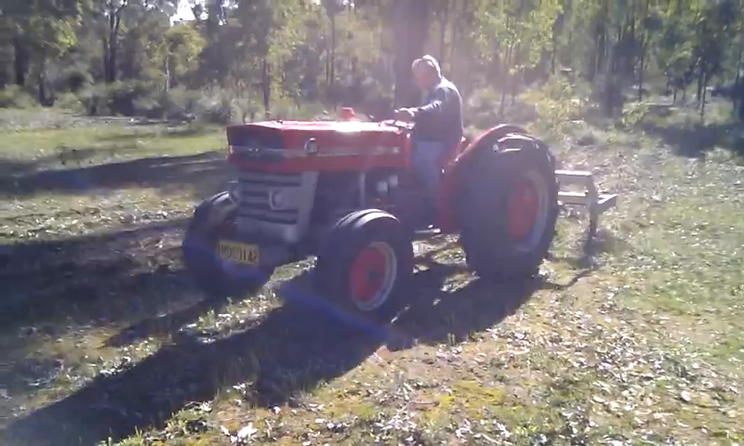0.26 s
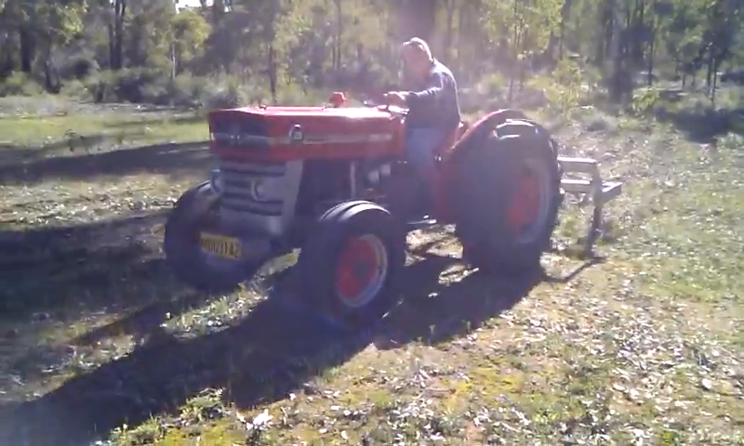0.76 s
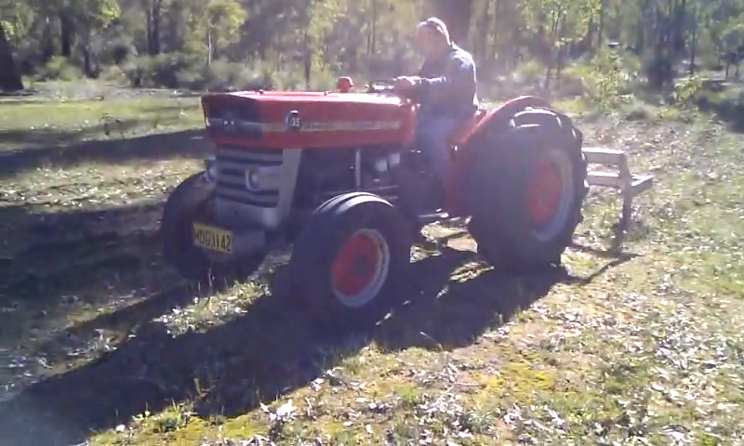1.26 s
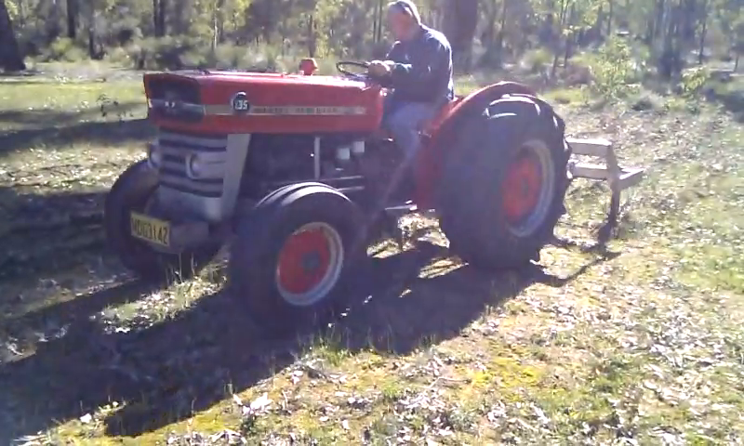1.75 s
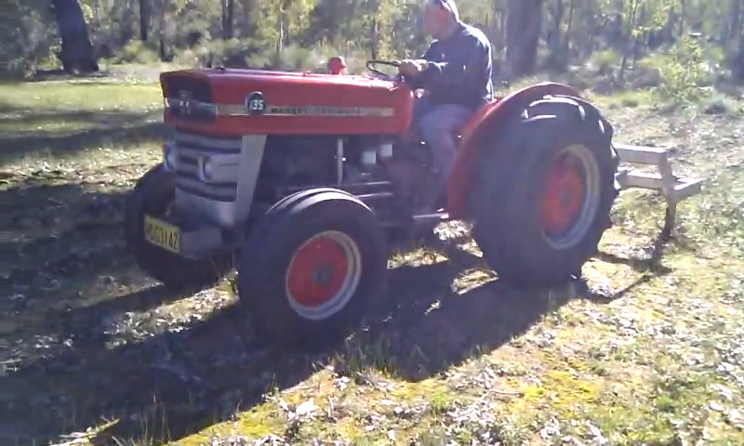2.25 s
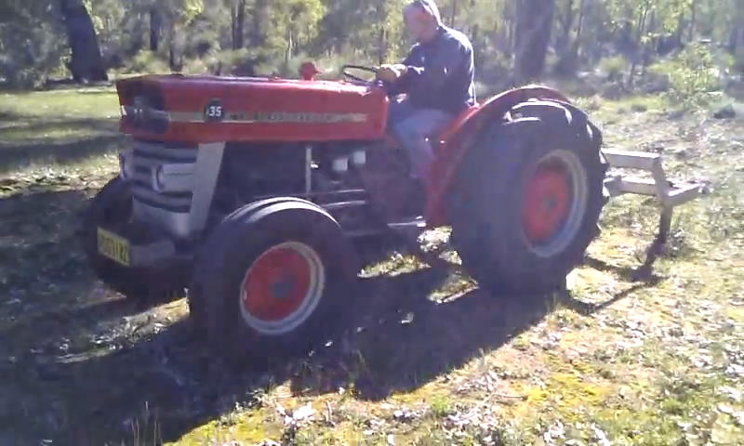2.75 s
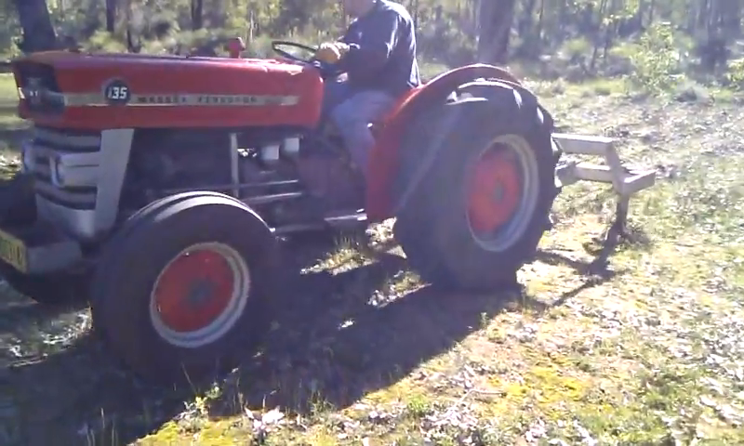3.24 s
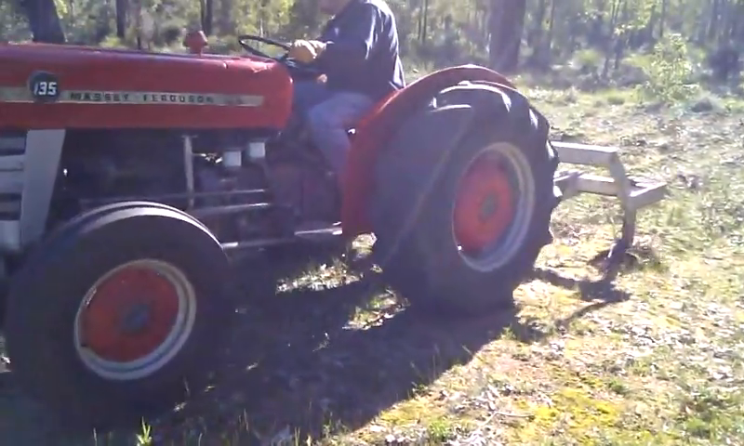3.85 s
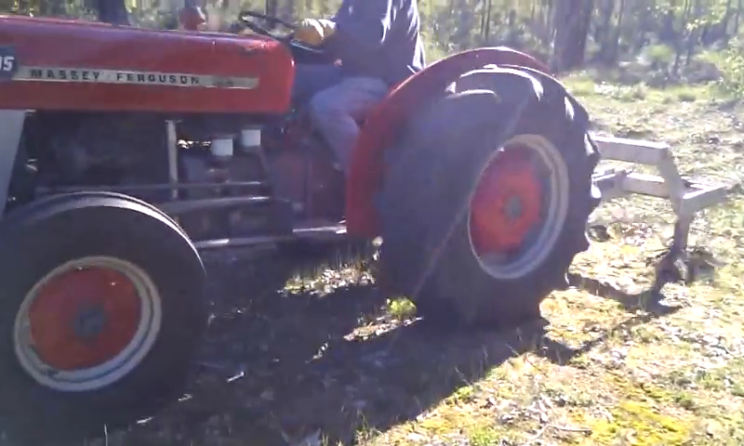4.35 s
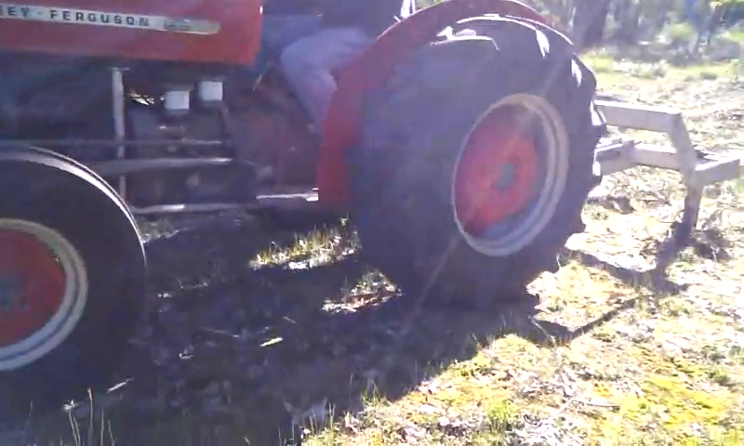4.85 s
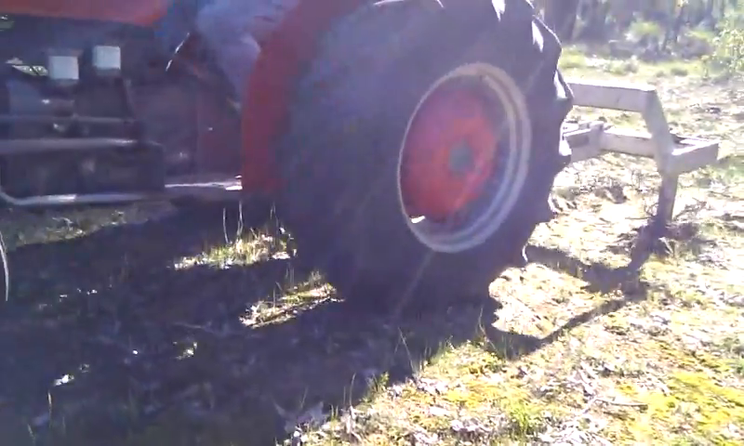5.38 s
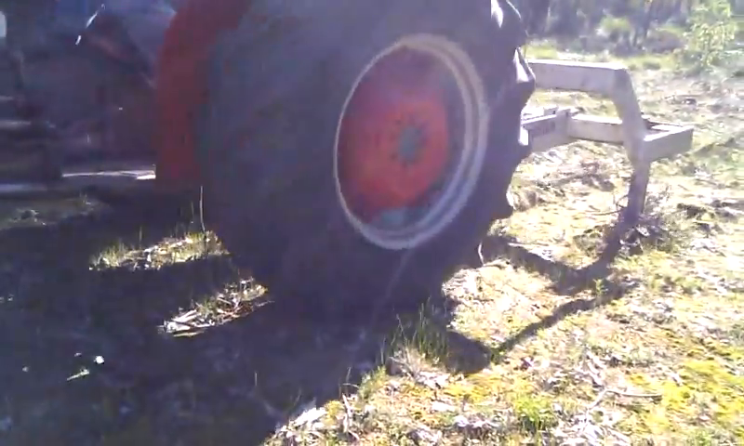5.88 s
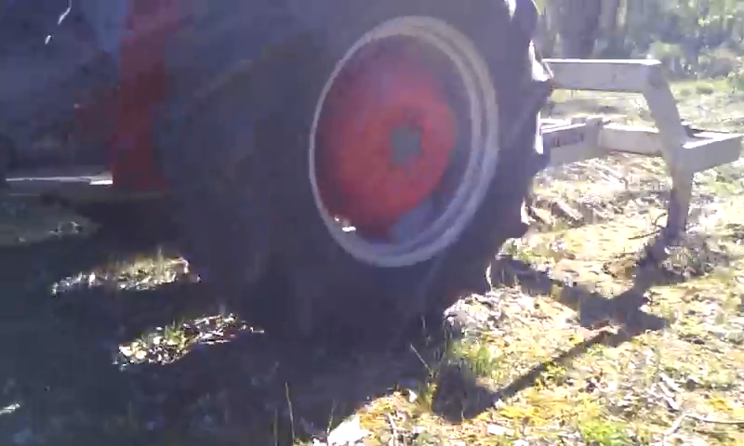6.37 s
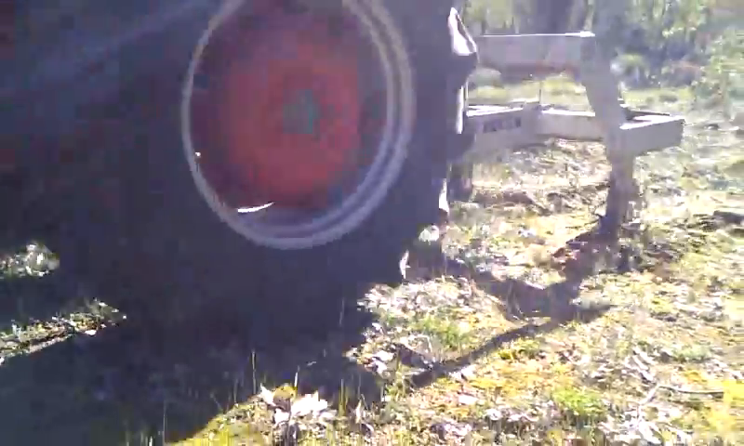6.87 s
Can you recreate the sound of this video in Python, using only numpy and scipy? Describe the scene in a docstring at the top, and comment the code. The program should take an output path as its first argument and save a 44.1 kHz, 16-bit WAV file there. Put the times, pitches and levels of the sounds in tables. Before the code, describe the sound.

Close, rough mono sound of an old three-cylinder tractor dragging a plough. Rapid exhaust pulses and gassy roar begin under a harsh hissing whine, which stops abruptly. The motor labours unevenly, swells, then its exhaust turns away and fades. Mechanical chatter and fine metallic sizzle continue, with wind gusts flattening and thumping the microphone, strongest near the end.

```python
"""In the open, a small three-cylinder diesel tractor crawls past, dragging a plough.
Exhaust pulses, sums of tones locked to the firing, throb with gas noise and later fade.
A bright blast of noise and whines lasts a second; valve and gear clatter stays, shaped noise
with a thin tick twice a firing. Wind on one microphone is flattened low noise with single pops."""
import sys
import numpy as np
from scipy import signal
from scipy.fft import rfft, irfft
from scipy.io import wavfile
from scipy.ndimage import uniform_filter1d

SR = 44100
rng = np.random.default_rng(int(sys.argv[2]) if len(sys.argv) > 2 else 0)


def transcribe(u):
    """Save the signal u as a 16-bit wav file named by the first command-line argument.

    u: samples, shape (n,) or (channels, n), limited to [-1, 1]; the rate is SR.
    q: integer samples, one column per channel.
    """
    v = np.clip(np.atleast_2d(u).T, -1, 1)
    q = np.round(v * 32767).astype(np.int16)
    wavfile.write(sys.argv[1], SR, q)


N = 313992

# Engine speed, sagging as the plough bites: time_s, firing_rate_hz
FIRING_RATE = [(0.0, 42.01), (0.5, 42.13), (1.0, 42.05), (1.75, 41.54), (2.15, 39.62), (2.4, 38.96),
               (3.4, 38.85), (3.8, 38.28), (4.1, 37.97), (4.5, 39.26), (4.9, 39.04), (5.12, 38.9),
               (5.4, 39.45), (5.7, 39.5), (6.1, 39.27), (7.12, 40.07)]
# Engine coming near, then turning away: time_s, exhaust_db, fourth_multiple_swell_db, roar_db
ENGINE_LEVELS = [(0.0, -29.5, -9, -27), (0.25, -26.5, -1, -26.5), (0.55, -27.5, -16, -27),
                 (0.72, -28.5, -1.5, -27.5), (1.0, -26, -0.5, -25), (1.2, -23, -12, -25),
                 (1.45, -24, -2, -23.5), (1.7, -23, -1.5, -28), (1.9, -23, -13, -24),
                 (2.06, -25.5, 1.5, -28), (2.25, -22.5, 1, -29), (2.55, -24.5, -7.5, -35),
                 (2.95, -29.5, -0.5, -41), (3.35, -29, -1, -40.5), (3.48, -25.5, -2, -36),
                 (3.85, -32, -5.5, -43.5), (4.05, -39, -6, -52.5), (4.4, -41.5, 5, -49),
                 (4.65, -48.5, -6, -56.5), (7.12, -51, 3, -52.5)]
# Brief dips of the clatter (negative depth lifts it); tick and roar take a share: time_s, depth_db, half_length_s
LEVEL_DIPS = [(1.07, -2, 0.033), (1.17, 28, 0.05), (1.34, 9, 0.046), (1.43, 5, 0.018), (2.33, 0, 0.059)]


def gain_of(db):
    """Logarithmic level: 20 dB is a factor of ten in amplitude."""
    return 10 ** (np.asarray(db) / 20)


def evened(x):
    """Normalisation by effective value: scales to rms 1."""
    return x / np.sqrt(np.mean(x ** 2) + 1e-20)


def curves(rows):
    """Linear interpolation of each column over time, one value a sample."""
    s, *columns = np.transpose(rows)
    return [np.interp(np.arange(N) / SR, s, column) for column in columns]


def bumps(rows):
    """Superposition of bell-shaped (Gaussian) swells, each of its own height and length."""
    t = np.arange(N) / SR
    return sum(height * np.exp(-((t - s) / half) ** 2) for s, height, half in rows)


def noise(colour, patchy_db, turns=None, repeat=0):
    """Spectral shaping of white noise in drifting patches; a share of its power follows the engine cycle."""
    x = rng.standard_normal(N)
    if turns is not None:
        # two patterns tied to the crank angle, three firings long, slowly trade places
        angle = (turns / 3 % 1 * 3000).astype(int)
        one, other = rng.standard_normal((2, 3000))[:, angle]
        drift = 1.45 * np.arange(N) / SR  # radians
        cyclic = np.cos(drift) * one + np.sin(drift) * other
        share = np.clip(repeat, 0, 1)
        x = np.sqrt(1 - share) * x + np.sqrt(share) * cyclic
    f, db = np.transpose(colour)
    hz = np.fft.rfftfreq(N, 1 / SR)
    colour_db = np.interp(np.log(hz + 1), np.log(f + 1), db, -90, -90)
    x = irfft(rfft(x) * gain_of(colour_db), N)
    # random gains, smoothed over frequency and time, make the patches
    z = signal.stft(x, nperseg=1024, noverlap=768)[2]
    patches = uniform_filter1d(rng.standard_normal(z.shape), size=6, axis=0)
    patches = uniform_filter1d(patches, size=10, axis=1)
    z = z * gain_of(patchy_db * evened(patches))
    return evened(signal.istft(z, nperseg=1024, noverlap=768)[1][:N])


def throb(turns, depth, sharp):
    """Amplitude modulation by exponential decay: a leap of random size at each whole turn."""
    leap_gains = gain_of(2.5 * rng.standard_normal(int(turns[-1]) + 1))
    size = leap_gains[turns.astype(int)]
    return uniform_filter1d(1 + depth * size * np.exp(-sharp * (turns % 1)), size=40)


def chugged(x, turns):
    """Band-wise amplitude modulation: each band throbs at its own moment of the firing."""
    # Bands of engine noise: band_top_hz, leap_at_firings, depth, sharpness_per_firing
    chug_bands = [(695, 0.682, 1.04, 1.5), (1420, 0.512, 1.14, 7.8), (2940, .07, 0.98, 2.8),
                  (15000, 0.81, 0.49, 4.8)]
    z, hz = rfft(x), np.fft.rfftfreq(N, 1 / SR)
    lows = [0] + [irfft(z / (1 + (hz / row[0]) ** 8), N) for row in chug_bands]
    leaps = [throb(turns - when, depth, sharp) for _, when, depth, sharp in chug_bands]
    # neighbouring low-passes differ by one band
    return evened(sum((wide - narrow) * evened(leap) for wide, narrow, leap in zip(lows[1:], lows, leaps)))


def whines(thirds, rows, turns):
    """Phase locking to the crank: wavering tones at fixed thirds of the firing rate, each with its swell."""
    waver = rng.standard_normal((len(rows), 40))
    t, steps = np.arange(N) / SR, np.linspace(0, 39, N)
    total = 0
    for k, (db, s, fade_db), chance in zip(thirds, rows, waver):
        waver_db = 0.9 * np.interp(steps, np.arange(40), chance)
        tone_db = db - abs(fade_db) * abs(t - s) + waver_db
        total = total + gain_of(tone_db) * np.cos(2 * np.pi * k * turns / 3 + k ** 2)
    return total


def wind():
    """Turbulent pressure on a membrane: saturated low noise in gusts, and single asymmetric pops."""
    # Wind level between gusts: time_s, level_db
    breeze = [(0.0, -73), (2.0, -56), (2.8, -55), (3.3, -34.5), (4.6, -36.5), (5.5, -44), (7.12, -40)]
    # Wind spectrum: frequency_hz, density_db (per Hz)
    wind_colour = [(2, -3), (8, -6), (16, 4), (30, -6.5), (50, -11), (80, -20.5), (130, -19), (200, -27.5),
                   (300, -52)]
    # Gusts added to the breeze: time_s, peak_db, half_length_s
    gust_rows = [(0.0, -42, .06), (0.53, -44, .1), (1.723, -48, .12), (2.28, -47, .05), (2.523, -44, .08),
                 (3.15, -36, 0.086), (3.7, -35, 0.16), (4.86, -45, 0.12), (5.087, -38, 0.036),
                 (5.364, -35.5, 0.075), (5.797, -48, 0.092), (6.245, -38, 0.03), (6.46, -31, 0.055),
                 (6.725, -36.5, 0.13), (7, -42, 0.027), (7.12, -48, 0.022)]
    # Single pops: time_s, peak_db, pitch_hz, direction (push 1, pull -1)
    pop_rows = [(3.152, -21, 150, 1), (3.271, -19, 150, 1), (4.302, -26, 40, -1), (4.38, -25, 45, -1),
                (4.649, -25, 50, 1), (4.742, -28, 49.7, 1), (4.7947, -31, 130, 1), (5.208, -36, 130, -1),
                (5.664, -27, 300, 1), (6.0115, -31, 124, -1), (6.024, -36, 90, -1), (6.233, -18, 144, 1),
                (6.231, -25, 25, 1), (6.245, -20, 22, -1), (6.29, -28, 150, -1), (6.3243, -14, 237, 1),
                (6.6117, -28, 190, -1), (6.619, -28, 60, 1), (6.6523, -28, 170, -1), (6.705, -23, 200, -1),
                (6.7318, -26, 140, -1), (6.7543, -33, 150, 1), (6.768, -27.5, 190, -1),
                (6.7993, -40, 150, -1), (6.947, -22, 195, -1), (6.9875, -38, 151, -1)]
    gusts = bumps([(s, gain_of(db), half) for s, db, half in gust_rows])
    # the membrane flattens big swings
    pressure = evened(np.tanh(0.38 * noise(wind_colour, patchy_db=2.5)))
    x = (gain_of(curves(breeze)[0]) + gusts) * pressure
    for s, db, hz, way in pop_rows:
        near = np.arange(round(s * SR) - 3000, round(s * SR) + 3000)
        t = near / SR - s
        # a sharp peak between two troughs, slower to fall than to rise
        u = abs(np.pi * hz * t * np.where(t < 0, 1.35, .8)) ** 1.7
        x[near] += np.sign(way) * gain_of(db) * (1 - 1.39 * u) * np.exp(-u)
    return x


def clatter(turns):
    """Impact excitation and resonance: knocks, ringing panels, gear whines, a fine sizzle and a tick."""
    # Valve and gear clatter: time_s, level_db, tick_db
    clatter_levels = [(1.1, -42, -50.5), (1.27, -35.5, -47), (1.47, -35.5, -47.5), (1.6, -42, -50),
                      (2.4, -42, -51.5), (2.99, -47, -52), (3.55, -43, -50), (3.93, -46, -51),
                      (6.05, -46, -50), (6.3, -44, -47.5), (7.12, -44, -48)]
    # Spectra of knocks, tick and fine metallic hiss: frequency_hz, density_db (per Hz)
    knock_colour = [(140, -51), (230, -8), (430, 0), (570, -7), (726, -1.5), (930, -1.5), (1090, 1.5),
                    (1175, -2.5), (1280, 1), (1490, 0), (1600, 0), (1770, -3.5), (2000, 0.5), (2510, 0.5),
                    (3400, -14), (4420, -46), (7480, -120)]
    tick_colour = [(6350, -41), (10800, -11), (11300, -6.5), (12100, -3), (12800, 4), (13800, 2),
                   (15600, -17)]
    sizzle_colour = [(1940, -32), (3300, -13), (3980, -6), (4460, 1), (5060, -5.5), (5540, -1), (6130, 2),
                     (7500, -6.5), (8680, -3), (11000, -6), (14300, -40), (22000, -120)]
    # Ringing panels: pitch_hz, width_hz, level_db, loudest_s, fade_db (per s around it)
    panels = [(1520, 90, -10.5, 5.8, 3), (2267, 35, -19, 5.1, 6)]
    # Gear whine pitches: thirds of the firing rate
    gear_thirds = [32, 34, 35, 35.7, 51, 57, 60, 63, 66, 66, 74, 87, 113, 116, 122, 161, 168, 170]
    # The same whines in turn: level_db (re layer), loudest_s, fade_db (per s around it, sign ignored)
    gear_whines = [(-8.5, 6.4, 5.8), (-13.5, 6, 8.2), (-12, 4.3, 6.9), (0.5, 2.5, 8.4), (-14.5, 7.2, 6.4),
                   (-8.5, 4.36, 8.9), (-7, 3, 3.2), (-7, 7.2, 12), (5, 0.7, 8.5), (-12, 5.4, 5.4),
                   (1.5, 1.6, 13), (-6.5, 2.8, 8.6), (-8.5, 7.4, 5.6), (-7.5, 5.5, 6.9), (-16, 1.7, 4.2),
                   (-10.5, 5.6, 7.4), (-7.5, 6.6, 11), (-6.5, 3.3, 4.2)]
    level_db, tick_db = curves(clatter_levels)
    dip_db = bumps(LEVEL_DIPS)
    level_db = level_db - dip_db
    tick_db = tick_db - 0.29 * dip_db
    body = noise(knock_colour, patchy_db=1.8, turns=turns, repeat=.3)
    for hz, width, db, s, fade_db in panels:
        ring = signal.lfilter(*signal.iirpeak(hz, hz / width, fs=SR), rng.standard_normal(N))
        body = body + gain_of(db - abs(fade_db) * abs(np.arange(N) / SR - s)) * evened(ring)
    knock = chugged(body, turns) + whines(gear_thirds, gear_whines, turns)
    hiss = noise(sizzle_colour, patchy_db=3.5, turns=turns, repeat=0.7)
    sizzle = evened(hiss * throb(turns + 0.13, depth=0.43, sharp=3.7))
    # twice a firing
    tick = evened(noise(tick_colour, patchy_db=2.5) * throb(2 * turns + 0.34, depth=1.9, sharp=4.1))
    return gain_of(level_db) * knock + gain_of(tick_db) * (gain_of(-2.5) * sizzle + tick)


def blast(turns):
    """Broadband flow noise of fan and intake at the nose, with whines; its treble sinks, then it cuts off."""
    # Blast spectrum: frequency_hz, density_db (per Hz)
    blast_colour = [(410, -14.5), (700, -7), (920, -14.5), (994, -11), (1340, -8), (2420, -14.5),
                    (2620, -14), (2800, -16), (3060, -4.5), (3230, -15.5), (3560, -7), (3940, -11.5),
                    (4400, -6.5), (4860, -0.5), (5150, -2.5), (5400, -3), (6300, -13), (6990, -20),
                    (10500, -31), (14100, -23), (15600, -22)]
    # Edges between the low part and three treble bands: frequency_hz
    band_edges = [2300, 3900, 7000]
    # Treble bands near 3, 5 and 10 kHz: start_db (re low part), loss_db (by the cut), lateness (exponent)
    treble_bands = [(-5.5, 15.5, 14), (-2.2, 37, 3.1), (-12.5, 12, 6.4)]
    # Gear and fan whine pitches: thirds of the firing rate
    nose_thirds = [54, 56, 65, 67, 93, 95, 104, 108, 112, 128, 150]
    # The same whines in turn: level_db (re low part), loudest_s, fade_db (per s around it, sign ignored)
    nose_whines = [(-16, 0.41, 8), (-14.5, 0.5, 0), (-9, 1, 6), (-15, 0.59, 1), (-8.5, .5, -1),
                   (-12.5, 0.45, -1), (-35, .5, 7), (-14, .6, 5), (-16, .66, 12), (-9.5, 0.51, 14),
                   (-29, .5, 0)]
    end_s = 1
    t = np.arange(N) / SR
    after = np.maximum(t - end_s, 0)
    # steady at -22 dB, a cut of 402 dB/s, then a tail from -32 dB falling 32 dB/s
    level_db = np.maximum(-22 - 402 * after, -32 - 32 * after)
    lift_db = [db - lost_db * np.minimum(t / end_s, 1) ** late for db, lost_db, late in treble_bands]
    x = noise(blast_colour, patchy_db=0.8, turns=turns, repeat=0.32)
    x = chugged(x, turns)
    lows = [signal.sosfiltfilt(signal.butter(4, hz, fs=SR, output="sos"), x) for hz in band_edges] + [x]
    treble = sum(gain_of(db) * evened(wide - narrow) for db, wide, narrow in zip(lift_db, lows[1:], lows))
    return gain_of(level_db) * (evened(lows[0]) + whines(nose_thirds, nose_whines, turns) + treble)


def roar(turns):
    """Periodically modulated noise: gas puffed out with each firing, half its power cyclic."""
    # Gas noise spectrum: frequency_hz, density_db (per Hz)
    gas_colour = [(30, -37), (60, -2), (120, -2.5), (170, -6), (240, -2.5), (326, -1.5), (360, -3),
                  (453, -6.5), (577, 0), (844, -8), (911, -7.5), (971, -10.5), (1530, -12.5), (1900, -18),
                  (2220, -25.5), (5000, -33), (6500, -38), (11000, -120)]
    gas = noise(gas_colour, patchy_db=0.5, turns=turns, repeat=0.5)
    level_db = curves(ENGINE_LEVELS)[2] - 0.3 * bumps(LEVEL_DIPS)
    return gain_of(level_db) * chugged(gas, turns)


def exhaust(turns):
    """Fourier synthesis: tones nearly in step make one peaked pulse a firing; the pipe delays higher ones."""
    # Share of the weakness on each cylinder in turn: share (-1 for the weak one)
    cylinder_shares = [0, 0, -1]
    # Weakness of the third cylinder: time_s, loss_db (whole from the 4th multiple, 0.2 of it on 1st and 3rd)
    weakness = [(0, 0.59), (1.8, 1.2), (2.3, 6.3), (3.8, 9.4), (5, 4.8)]
    # Exhaust tones: multiple (of the firing rate), free_db, loaded_db, waver_db
    tones = [(1, -10, -7, -1), (2, -0.5, -0.5, 1.36), (3, -1, -9.5, 1.5), (4, -3.5, -7.5, 1.8),
             (5, -18, -12, 2.5), (6, -28, -32, 3), (7, -18, -24, 3), (8, -15, -23, 1.9), (9, -30, -34, 1),
             (10, -24.5, -37, 6), (11, -26.5, -41, 0), (12, -27.5, -33, 1.5), (14, -18.5, -27, -5),
             (16, -30, -40, 9)]
    # Tones between the multiples, from uneven cylinders: thirds of the firing rate
    between_thirds = [7, 10, 13, 16]
    # The same tones in turn: free_db, loaded_db, free_lag_cycles, loaded_lag_cycles
    between_tones = [(-20, -32, 0.082, .05), (-15.5, -14, 0.54, 0.57), (-17, -21.5, 0.42, 0.29),
                     (-25, -17.5, 0.21, 0.42)]
    # Loudest rings of the silencer: time_s, swell_db
    silencer_rings = [(.12, 7), (.406, 8), (0.475, 7), (.763, 12), (1.263, 10), (1.333, 5), (1.405, 7.5),
                      (1.477, 7), (1.695, 11), (1.768, 3)]
    free_hz, loaded_hz = 41.6, 39.3  # firing rates without and with full load
    lag_free, lag_loaded = 0.0973, 0.049  # cycles a multiple away from the 2nd
    waver_per_s = 6
    echo_late, echo_width, echo_db = 0.416, .11, -1  # firings, firings, dB re a 0 dB tone

    level_db, swell_db = curves(ENGINE_LEVELS)[:2]
    # a swell once in three firings, on the 7th and 8th multiples
    ring_db = 3.5 * np.cos(2 * np.pi * (turns - 1.85) / 3)
    ring_db = ring_db + bumps([(s, db, 0.012) for s, db in silencer_rings])
    load = np.clip((free_hz - curves(FIRING_RATE)[0]) / (free_hz - loaded_hz), 0, 1)
    lag = lag_free + load * (lag_loaded - lag_free)
    firing = np.arange(int(turns[-1]) + 2)
    # single firings also scatter, in proportion to the weakness
    lost = np.take(cylinder_shares, firing, mode="wrap") + 0.22 * rng.standard_normal(len(firing))
    weak_db = curves(weakness)[0] * np.interp(turns, firing, lost)
    steps = np.arange(N) / SR * waver_per_s
    x = np.zeros(N)
    for (k, free_db, load_db, waver_db), chance in zip(tones, rng.standard_normal((len(tones), 100))):
        k = round(k)
        db = free_db + load * (load_db - free_db)
        db = db + waver_db * np.interp(steps, np.arange(len(chance)), chance)
        if k < 4:
            db = db + 0.2 * (k - 2) ** 2 * weak_db
        else:
            db = db + weak_db + swell_db * (k == 4) + ring_db * (6 < k < 9)
        x = x + gain_of(db) * np.cos(2 * np.pi * (k * turns - lag * abs(k - 2)))
    for k, (free_db, load_db, free, loaded) in zip(between_thirds, between_tones):
        db = free_db + load * (load_db - free_db)
        cycles = k * turns / 3 - free - load * (loaded - free)
        x = x + gain_of(db) * np.cos(2 * np.pi * cycles)
    # under load a second pulse follows the first cylinder
    u = ((turns % 3 - echo_late) / echo_width) ** 2
    x = x + load * gain_of(echo_db) * (1 - 2 * u) * np.exp(-u)
    return np.sqrt(2) * gain_of(level_db) * x  # root 2: a 0 dB tone has the exhaust level as its rms


def scene():
    """Phase as integrated frequency: all engine sounds follow the count of firings."""
    turns = np.cumsum(curves(FIRING_RATE)[0]) / SR + 2.77
    x = exhaust(turns) + roar(turns) + blast(turns) + clatter(turns) + wind()
    return np.array([x, x])


def record(dry):
    """Gain modulation and band limiting: sudden ducks climb back exponentially under a low-pass."""
    # Ducks of the whole sound: start_s, depth_db
    ducks = [(0.032, 8), (0.239, 5.5), (0.531, 4.5), (0.697, 4), (1.035, 4.5), (1.41, 0), (1.76, 3.5),
             (2.27, 3), (3.732, 4.5), (4.93, 3.5), (6.841, 5)]
    offset, edge_hz = -0.01, 15750  # converter offset (full scale, ducked with the sound), low-pass edge
    t = np.arange(N) / SR
    duck_db = sum(db * (t > s) * np.exp(-np.maximum(t - s, 0) / 0.082) for s, db in ducks)
    wet = (dry + offset) * gain_of(-uniform_filter1d(duck_db, size=200))
    low_pass = signal.firwin(511, edge_hz, window=("kaiser", 9), fs=SR)
    return signal.oaconvolve(wet, low_pass[None], "same")


dry = scene()
out = record(dry)
transcribe(out)
```